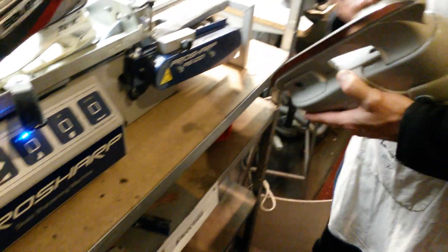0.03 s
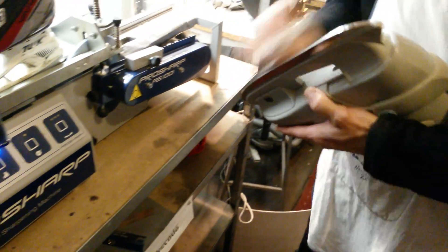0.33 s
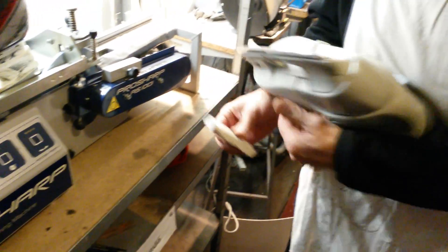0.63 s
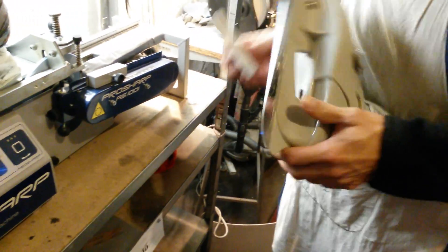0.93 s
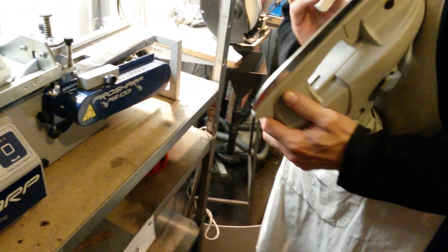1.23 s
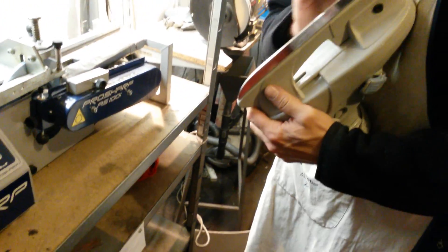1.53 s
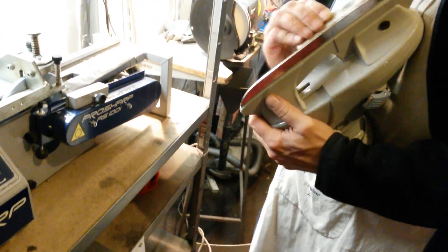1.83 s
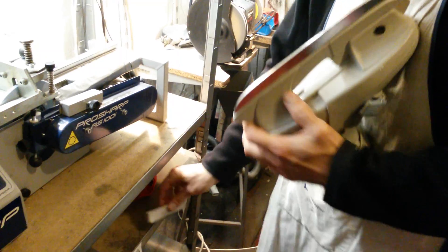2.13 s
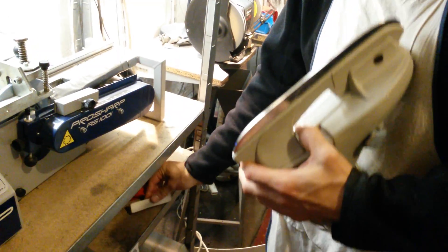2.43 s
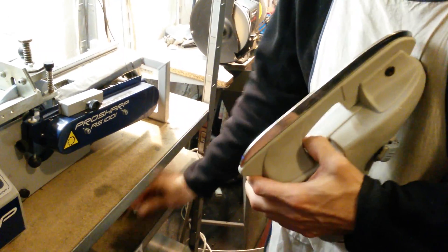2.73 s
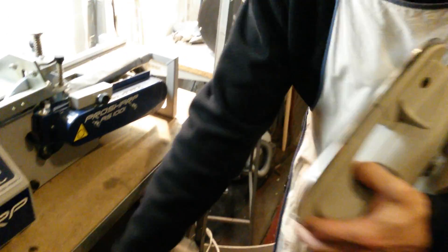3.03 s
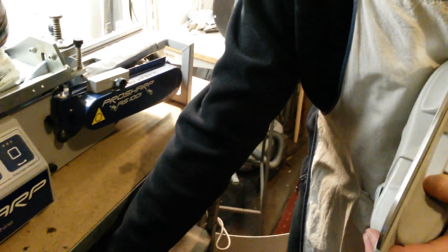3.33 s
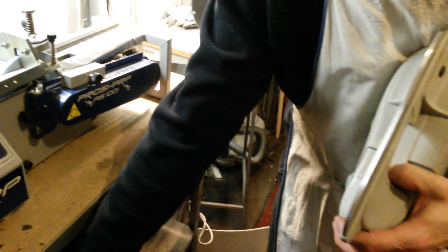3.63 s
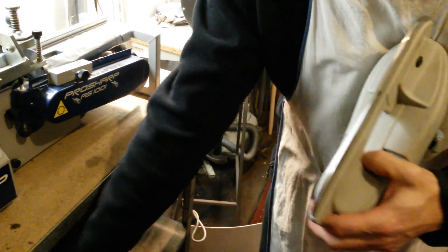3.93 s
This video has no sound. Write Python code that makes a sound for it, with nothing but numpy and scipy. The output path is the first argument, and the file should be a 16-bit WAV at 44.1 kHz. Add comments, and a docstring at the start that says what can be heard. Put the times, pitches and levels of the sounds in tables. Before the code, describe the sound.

Steady bright suction hiss from an idling skate sharpener, with short blade scrapes and a knock.

```python
"""A steady, bright hiss of suction fills a workshop: a skate sharpening machine is idling.
Its fan pulls air through ringing ducts and a whistling intake and sets the casing droning;
the motor whines and the housing hums near mains multiples, all swelling and sinking a little.
A hand stone rasps and clinks along a skate blade, then knocks down onto a wooden shelf."""
import sys
import numpy as np
from scipy import signal
from scipy.fft import rfft, irfft
from scipy.io import wavfile

SR = 44100
rng = np.random.default_rng(int(sys.argv[2]) if len(sys.argv) > 2 else 0)


def wrap_up_sound(samples):
    """Save the sound to the file named by the first command line argument, as 16-bit audio."""
    columns = np.atleast_2d(samples).T
    # keep every value between -1 and 1, then stretch to whole-number steps
    tamed = np.clip(columns, -1, 1)
    steps = np.round(tamed * 32767).astype(np.int16)
    wavfile.write(sys.argv[1], SR, steps)


N = 176400
TIME, BIN_HZ = np.arange(N) / SR, np.arange(N // 2 + 1) * SR / N


def suction():
    """The fan's rushing air rings the ducts; the bed swells slowly and turbulence flutters the hiss."""
    # colour of the rushing air: f/Hz, left density/(dB per Hz), right density/(dB per Hz)
    air_colour = [(20, -89.8, -88.6), (28, -89.2, -87.8), (42, -80, -77), (80, -70, -70),
                  (124, -66.5, -66.5), (192, -74.5, -71.5), (275, -64.5, -64.5), (442, -62, -61),
                  (505, -61.5, -63), (807, -64, -64), (906, -59.5, -59.5), (1250, -61, -63.5),
                  (1470, -61, -65.5), (1590, -63, -56.5), (1780, -62, -59.5), (2640, -61, -59),
                  (3200, -61, -61), (4100, -60.5, -61.5), (4300, -57, -60), (4800, -58.5, -65),
                  (5400, -58, -58.5), (5980, -57.5, -67), (6450, -57, -56.5), (7110, -47, -54.5),
                  (7470, -45.5, -47.5), (7950, -47.5, -51), (8420, -55.5, -51), (9850, -61.4, -61),
                  (11400, -65.5, -64.5), (12600, -67, -65.5), (13420, -74, -71), (14400, -86, -86)]
    # narrow fan and duct resonances: f/Hz, width/Hz, left level/dB, right level/dB
    duct_modes = [(362, 4.5, -65, -59), (981, 5.6, -47, -46.5), (1240, 8.8, -48, -40.5),
                  (1269, 4.8, -43, -50), (1376, 5, -69, -42.5), (1395, 8.1, -64, -44), (1570, 22, -53, -49),
                  (1638, 10, -41.5, -54), (1716, 15, -41.5, -52), (6960, 18, -37, -44),
                  (7280, 14, -40, -36), (7050, 14, -55, -42), (7470, 18, -38, -49), (7400, 18, -32, -46),
                  (7690, 24, -27.5, -40), (8270, 65, -47, -29)]
    # slow swell of the air: t/s, hiss gain/dB, low rush gain/dB
    swell = [(0, -0.5, 0), (.6, -1, -1), (1.2, -0.6, -0.9), (1.5, 0.6, 0.5), (1.9, 0.5, 0.2),
             (2.35, -0.5, -0.5), (2.8, -1, 0), (3.15, 0.9, 1), (3.6, 0.45, 1.5), (4, 1, 0.5)]
    crossover_hz, flutter_db = 1600, 0.55
    air = stereo_noise() * from_db(in_frequency(air_colour)) * np.sqrt(SR / 2) * reflections()
    spectrum = air + rfft(air_ring(duct_modes))
    low_share = 1 / (1 + (BIN_HZ / crossover_hz) ** 2)
    hiss_db, rush_db = in_time(swell)
    hiss = irfft(spectrum * (1 - low_share), N) * from_db(hiss_db + flutter_db * drift(per_s=15))
    rush = irfft(spectrum * low_share, N) * from_db(rush_db)
    return hiss + rush


def motor_whine():
    """Motor tones wander together in pitch; moving surfaces make them fade differently at each ear."""
    # whine and its side tones: f/Hz, left level/dB, right level/dB
    tones = [(1127, -52, -50), (1191, -38.5, -32), (1252, -47, -46.5), (1293, -43, -54)]
    # level ride of the whine: t/s, gain/dB
    ride = [(0, 2), (.35, 0.5), (.5, 0), (.75, -0.5), (1.05, 2), (1.3, .5), (1.55, 4), (1.9, 2), (2.1, -1),
            (2.7, -2.5), (2.95, -3.5), (3.35, -0.5), (3.7, -2), (4, -5)]
    waver_db, scatter_share, fades_per_s = 0.5, 0.18, 5.7
    wander_hz = 0.75 * drift(per_s=1.54)
    level = from_db(in_time(ride) - waver_db * drift(per_s=7))
    out = 0
    for hz, left_db, right_db in tones:
        scatter = np.array([drift(fades_per_s) + 1j * drift(fades_per_s) for ear in range(2)])
        tone = np.exp(2j * np.pi * (np.cumsum(hz + wander_hz) / SR + rng.random()))
        fading_tone = np.real(tone * (level + scatter_share * scatter / np.sqrt(2)))
        out += from_db([[left_db], [right_db]]) * np.sqrt(2) * fading_tone
    return out


def blade_rasps():
    """The stone's grit ticks densely over the steel edge during each short stroke."""
    # strokes along the blade: t/s, length/s, level/dB
    strokes = [(0.421, 0.039, -20), (1.44, .04, -24), (1.514, .065, -25), (1.722, 0.094, -23),
               (1.88, 0.052, -20), (1.999, 0.013, -17)]
    # colour of the rasp: f/Hz, relative level/dB
    colour = [(500, -30), (2000, -7), (4000, -8), (5400, -4), (7000, 5), (8500, -4), (11500, -10),
              (14000, -24)]
    grits_per_s, spread_db = 1800, 6.5
    ticks = (rng.random((2, N)) < grits_per_s / SR) * rng.choice([-1, 1], (2, N))
    grit = ticks * from_db(spread_db * rng.standard_normal((2, N)))
    rasp = rms_one(irfft(rfft(grit) * from_db(in_frequency(colour)), N))
    envelope = sum(from_db(db) * pressure(start, length) for start, length, db in strokes)
    return panned(left_lead_db=8) * rasp * envelope


def blade_clinks():
    """Each catch of the stone drives one resonance of the blade, which the hand quickly damps."""
    # catches: t/s, length/s, f/Hz, level/dB, roughness/(0-1), left minus right/dB
    catches = [(0.436, .027, 6223, -19, .5, 2), (0.449, 0.01, 2380, -14.5, 0.73, -5),
               (1.792, .008, 5500, -19, 0.2, 3), (1.89, 0.01, 2330, -18, 0.27, -9),
               (1.92, .008, 4700, -20, .3, 3)]
    t60_s, relative_width = 0.04, 0.099
    pole = from_db(-60 / (t60_s * SR))
    out = 0
    for start, length, hz, db, roughness, pan_db in catches:
        envelope = signal.lfilter([1 - pole], [1, -pole], pressure(start, length) + 1e-18)
        scuff = resonate(rng.standard_normal((2, N)), hz, relative_width * hz)
        ping = np.sqrt(2) * np.sin(2 * np.pi * hz * TIME)
        out += from_db(db) * panned(pan_db) * envelope * (roughness * scuff + (1 - roughness) * ping)
    return out


def shelf_knocks():
    """The stone lands with a short clack and settles, ringing the wooden shelf."""
    # landing and two softer bumps: t/s, level/dB
    knocks = [(2.731, -19.5), (2.757, -28), (2.814, -32)]
    # modes of the shelf: f/Hz, relative level/dB, t60/s
    modes = [(196, -13.5, 0.84), (261, -3.5, 0.14), (352, -3, 0.054), (423, 0, 0.065), (690, -9, 0.047)]
    clack_db, low_cut_hz = -3, 240
    out = 0
    for start, db in knocks:
        age = np.maximum(TIME - start, 0)
        contact = (age > 0) * decay(age, t60_s=0.06) * rng.standard_normal((2, N))
        out += from_db(db + clack_db) * resonate(contact, hz=620, width_hz=310)
        for hz, mode_db, t60_s in modes:
            out += from_db(db + mode_db) * decay(age, t60_s) * np.sin(2 * np.pi * hz * age)
    return signal.sosfilt(signal.butter(2, low_cut_hz, "high", fs=SR, output="sos"), out)


def intake_whistle():
    """Air rings the intake: a faint, breathy whistle that comes and goes, strongest at the end."""
    # intake resonances: f/Hz, width/Hz, left level/dB, right level/dB
    modes = [(4130, 40, -47, -51), (4236, 10, -39.5, -41.5), (4260, 13, -50, -50), (4340, 47, -46, -50)]
    # level ride of the whistle: t/s, gain/dB
    ride = [(0, 3), (.85, -3), (1.04, 6), (1.2, -2), (1.8, -3), (2.3, -2), (2.55, 3), (2.78, -4),
            (3.2, 4.5), (3.5, 2.5), (3.88, 6), (4, 7)]
    return air_ring(modes) * from_db(in_time(ride))


def mains_hum():
    """The housing hums near mains multiples, wavering, dead centre."""
    # hum partials: f/Hz, level/dB
    partials = [(100, -42.5), (150.8, -48.5)]
    # level ride of the hum: t/s, gain/dB
    ride = [(0, 1), (.65, -3), (1.3, -2), (1.55, 1.5), (1.87, 2.5), (2.03, -6), (2.25, 3), (2.6, 1.5),
            (2.75, -4), (3.3, 3), (3.8, 0), (3.93, 4)]
    waver_db = 1
    out = 0
    for hz, db in partials:
        level = from_db(db + in_time(ride) + waver_db * drift(per_s=2.4))
        out += level * np.sqrt(2) * np.sin(2 * np.pi * (hz * TIME + rng.random()))
    return out


def casing_drone():
    """Turbulence makes the fan casing boom faintly, building toward the end."""
    # casing resonances: f/Hz, width/Hz, left level/dB, right level/dB
    modes = [(200, 16, -54.5, -52.5), (245.4, 8.9, -49.5, -53), (406.4, 6.3, -54, -48.5),
             (455, 2.5, -50, -44.5)]
    # level ride of the drone: t/s, gain/dB
    ride = [(0, -5), (2.2, -3), (2.6, -2.5), (2.95, 2), (3.3, 3), (4, 4)]
    return air_ring(modes) * from_db(in_time(ride))


def reflections(count=12, total_db=-6.5, delay_scale_s=0.011):
    """Early echoes off bench and walls comb a fine ripple into the spectrum at each ear."""
    echoes = np.zeros((2, N))
    for ear in echoes:
        polarity = rng.choice([-1, 1], count)
        delays_s = delay_scale_s * (0.5 + 2 * rng.random(count))
        ear[(delays_s * SR).astype(int)] = polarity
    return rms_one(np.abs(1 + from_db(total_db) / np.sqrt(count) * rfft(echoes)))


def air_ring(modes):
    """Narrow resonances kept ringing by turbulence."""
    turbulence = irfft(stereo_noise(), N)
    return sum(from_db([[left_db], [right_db]]) * rms_one(resonate(turbulence, hz, width_hz))
               for hz, width_hz, left_db, right_db in modes)


def stereo_noise():
    """Spectrum of white noise, centred in the bass and wide in the treble."""
    # likeness of the air at the two ears: f/Hz, correlation/(0-1)
    likeness = [(60, 1), (110, 0.77), (200, 1), (370, 0.89), (680, 0.62), (1240, 0.37), (2280, 0.03),
                (4200, .01)]
    alike = in_frequency(likeness)
    mid, side = rfft(rng.standard_normal((2, N)))
    return np.sqrt((1 + alike) / 2) * mid + np.sqrt((1 - alike) / 2) * side * [[1], [-1]]


def resonate(x, hz, width_hz):
    """Two-pole resonance that keeps the rms of white noise."""
    r = np.exp(-np.pi * width_hz / SR)
    feedforward = np.sqrt((1 - r * r) / 2) * np.array([1, 0, -1])
    feedback = [1, -2 * r * np.cos(2 * np.pi * hz / SR), r * r]
    return signal.lfilter(feedforward, feedback, x + 1e-18)


def drift(per_s):
    """Slow random motion of unit rms."""
    hop, run_in = 40, 2000
    r = np.exp(-2 * np.pi * per_s * hop / SR)
    noise = rng.standard_normal(N // hop + run_in + 2)
    slow = signal.lfilter([1], [1, -2 * r, r * r], noise)[run_in:]
    return np.interp(np.arange(N) / hop, np.arange(len(slow)), rms_one(slow))


def pressure(start, length):
    """Force of one contact: it rises, holds and lets go."""
    progress = np.clip((TIME - start) / length, 0, 1)
    return np.sqrt(np.abs(np.sin(np.pi * progress)))


def decay(age, t60_s):
    """Exponential tail with a floor at -120 dB."""
    return from_db(-60 * np.minimum(age / t60_s, 2))


def panned(left_lead_db):
    """Left and right gains for a level difference."""
    return from_db([[left_lead_db / 2], [-left_lead_db / 2]])


def in_time(rows):
    """Columns of a time table at every sample."""
    times, *columns = np.transpose(rows)
    return np.array([np.interp(TIME, times, column) for column in columns])


def in_frequency(rows):
    """Columns of a spectrum table at every bin, joined on a log frequency axis."""
    hz, *columns = np.transpose(rows)
    log_bins = np.log(np.maximum(BIN_HZ, 1))
    return np.array([np.interp(log_bins, np.log(hz), column) for column in columns])


def from_db(db):
    """Decibels to gain."""
    return 10 ** (np.asarray(db) / 20)


def rms_one(x):
    """Scale to unit rms."""
    return x / np.sqrt(np.mean(x ** 2) + 1e-20)


def scene():
    """The idling machine as a bed, with the stone work on top."""
    machine = suction() + casing_drone() + intake_whistle() + motor_whine() + mains_hum()
    return machine + blade_clinks() + blade_rasps() + shelf_knocks()


def record(dry):
    """Clip any peaks above the ceiling and cut the top end steeply."""
    ceiling, cutoff_hz = 0.88, 14500
    clipped = np.clip(dry, -ceiling, ceiling)
    return irfft(rfft(clipped) / np.sqrt(1 + (BIN_HZ / cutoff_hz) ** 400), N)


dry = scene()
out = record(dry)
wrap_up_sound(out)
```